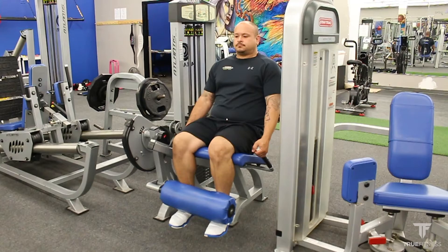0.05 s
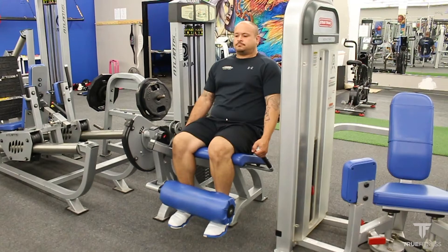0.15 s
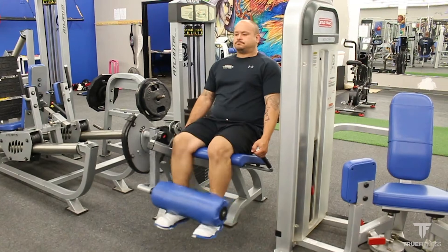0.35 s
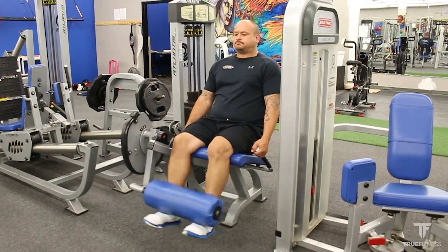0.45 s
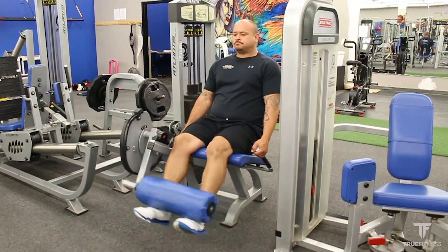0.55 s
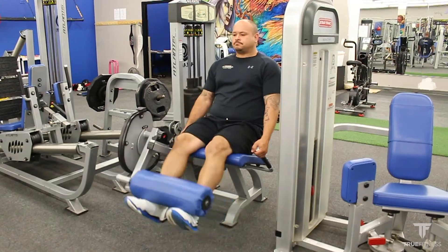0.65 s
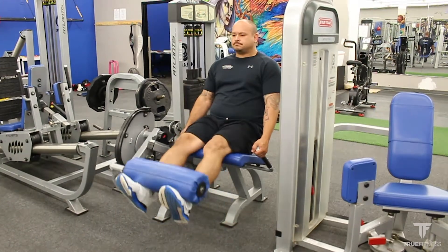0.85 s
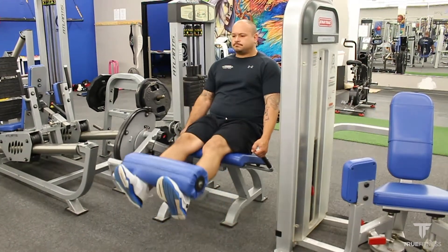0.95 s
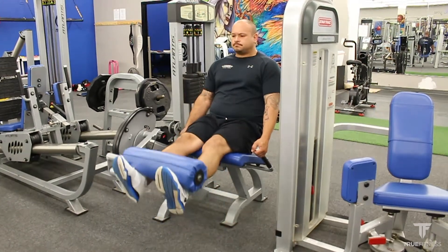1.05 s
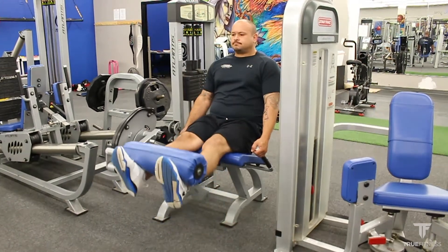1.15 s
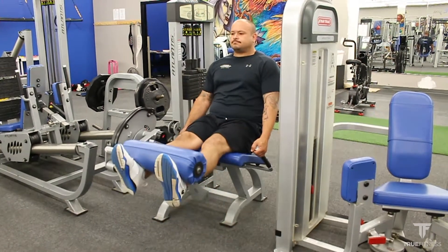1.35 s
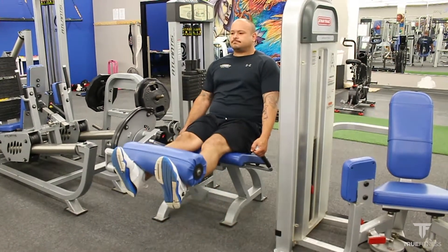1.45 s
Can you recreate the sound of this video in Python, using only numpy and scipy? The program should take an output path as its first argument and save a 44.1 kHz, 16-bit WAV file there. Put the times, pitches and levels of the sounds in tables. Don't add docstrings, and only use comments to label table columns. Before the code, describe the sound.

Steel plates clink lightly and the stack clanks hard, rattling briefly; a drier clack and creaking ticks follow, ending in small knocks. Close microphone, reverberant gym hall, faint hiss and low air rumble.

```python
import sys
import numpy as np
from scipy import signal
from scipy.fft import rfft, irfft
from scipy.io import wavfile
from scipy.ndimage import uniform_filter1d

SR = 44100
rng = np.random.default_rng(int(sys.argv[2]) if len(sys.argv) > 2 else 0)


def to_linear_factor(level_db):
    exponent = np.asarray(level_db, float) / 20
    return 10 ** exponent


def generate_wav(sig):
    pcm = np.round(np.clip(np.atleast_2d(sig).T, -1, 1) * 32767).astype(np.int16)
    wavfile.write(sys.argv[1], SR, pcm)


N = 66150
SPAN = 4096

# t/s, level/dB, rattle/s
CLINKS = [
    (.03, -37.5, 0.018),
    (.2375, -32, 0.0067),
    (.2435, -31.5, 0.0069),
    (.447, -30, 0.0085),
    (.459, -33.5, 0.0099),
    (.494, -39, 0.018),
]
# f/Hz, level/dB, t60/s
CLINK_MODES = [(895, 1, 0.015), (1598, 1, 0.091), (2750, 0, 0.14), (2920, 4.5, 0.062), (3310, 3.5, 0.12),
               (4180, -3.5, 0.084), (4645, -1, 0.11), (5200, -4.5, .05), (5760, -18, 0.054),
               (6500, -2, 0.042), (7080, 4, 0.021), (9150, -18, .04)]
# f/Hz, level/dB
CLINK_CRACK = [(180, -24.5), (300, 8), (565, -11), (1580, 2.5), (2100, -9), (2930, -5.5), (3830, -7),
               (9390, -20.5), (16000, -52)]
# t/s, level/dB, rattle/s
CLANKS = [
    (.2885, -10.5, 0.0045),
    (.2908, -9, 0.003),
    (.2927, -8, 0.0018),
    (.2965, -20, 0.014),
    (.3045, -24, .006),
    (.333, -30.5, 0.015),
]
# f/Hz, level/dB, t60/s
CLANK_MODES = [(361.3, 4.5, 0.29), (555, -7, 0.28), (596.6, -0.5, 0.3), (673, 10, 0.3), (760, 9, 0.32),
               (841, 3.5, 0.27), (1451, 9.5, 0.23), (1640, -20, 0.26), (2300, -15, 0.013),
               (3180, -9, 0.079), (3560, 3, 0.048), (4240, 1, 0.051), (5100, -18, 0.053), (6570, -13, .06)]
# f/Hz, level/dB
CLANK_CRACK = [(90, -54), (330, -16), (800, -1.5), (1150, -9.5), (1900, -7.5), (3100, -3.5), (6000, -18),
               (16000, -41)]
# t/s, level/dB, rattle/s
CLACKS = [
    (.6158, -25, 0.005),
    (.6208, -29, 0.012),
]
# f/Hz, level/dB, t60/s
CLACK_MODES = [(735, -11, 0.3), (1110, -39, 0.052), (1460, -3.5, 0.14), (2240, 6, 0.022), (2530, -16, 0.08),
               (2840, 4, 0.022), (2700, -3, 0.085), (3220, -6, 0.098), (3320, 3.5, 0.036),
               (4320, -28, 0.061), (5200, -19, 0.059)]
# f/Hz, level/dB
CLACK_CRACK = [(180, -4), (300, -1), (1840, -13), (2320, 2), (3400, 3), (6000, -17), (6850, -19),
               (7690, -26), (16000, -48)]
# t/s, level/dB, length/s
SNAPS = [
    (.2378, -32.5, 0.0062),
    (.2886, -28, 0.0032),
    (.333, -38.5, 0.0029),
    (.4472, -36, 0.0024),
    (.6152, -35.5, 0.002),
    (.7058, -36.5, 0.0018),
]
# f/Hz, level/dB
SNAP_EDGE = [(2000, -28), (6000, -3), (10000, -3.5), (16000, -18)]
# t/s, peak level/dB, f/Hz, t60/s
PINGS = [(.2378, -28, 1620, .07), (.2575, -38, 2800, .08), (.2905, -19, 812, .09), (.295, -21, 660, .08),
         (.297, -27, 370, .2), (.298, -27, 1450, .09), (.311, -27, 790, .07), (.329, -29, 600, .12),
         (.364, -32, 690, .12), (.2888, -22, 760, .04), (.4475, -34, 1640, .06), (.623, -30, 1110, .05),
         (.619, -29, 1510, .05), (1.2215, -30, 760, .04), (1.2492, -28, 830, .04), (.2379, -27, 3100, .035),
         (.2435, -27, 3150, .03), (.4473, -28, 2900, .04), (.4476, -31, 3450, .04),
         (.2886, -17, 13000, .003), (.2887, -21, 10500, .004), (.2888, -21, 8500, .005),
         (.2912, -26, 14500, .004), (.6106, -30, 3200, .01), (.6163, -14, 2450, .014),
         (.6168, -19, 2950, .012), (.6184, -17, 3350, .012), (.6211, -19, 3300, .014),
         (.6232, -23, 2600, .012), (.6262, -24, 2950, .018), (.631, -23, 3200, .02),
         (.6415, -23, 3100, .01), (.7056, -18, 1200, .005), (.7059, -27, 2050, .006),
         (.7071, -20, 1250, .006), (.712, -36, 700, .15), (.7092, -27, 800, .018), (.936, -34, 2500, .01),
         (1.1992, -22, 2900, .006), (1.2018, -29, 2900, .007), (1.2076, -26, 2870, .007),
         (1.2102, -27, 2900, .008), (1.2474, -21, 2700, .008), (1.2477, -28, 4600, .01),
         (1.25, -28, 2450, .012), (1.2522, -29, 2050, .012), (1.2548, -32, 3000, .008),
         (1.29, -33, 2000, .025)]
# t/s, level/dB, length/s
THUDS = [
    (.2975, -46, 0.015),
    (1.2225, -30, 0.0047),
    (1.2485, -36, 0.005),
]
# f/Hz, level/dB
THUD_BODY = [(50, -46), (130, -17), (290, 4), (460, -0.5), (900, -38), (2000, -61)]
# t/s, level/dB, brightness/(dB per octave), knock level/dB
TICKS = [(0.547, -49, -12, 0), (0.5612, -35, -7, -20), (0.576, -39, -2, -13), (0.588, -41.5, 2, 8.5),
         (0.598, -40, 3, 4), (0.611, -35, -6, 2), (.689, -33.5, -6, -29), (0.7015, -38, -1, -16),
         (0.7048, -33, -4, 6.5), (0.726, -38, -4, -24), (0.9358, -43.5, -16, 5.5), (0.987, -45.5, 4, -18),
         (0.999, -44, -1, -18), (1.061, -40.5, 2, -13), (1.071, -43, -5, 1), (1.132, -44.5, 7, 5),
         (1.141, -39, -3, -5), (1.182, -45, -1, -5), (1.1986, -41.5, 6, 2.5), (1.207, -34, 3, -3),
         (1.2204, -24.5, 5, -4.5), (1.2486, -32, -3, -1), (1.255, -44.5, -10, 12), (1.28, -40.5, 9, -23),
         (1.2927, -44.5, -2, 3), (1.341, -52, 15, -3), (1.36, -46, 4, 5)]
# f/Hz, level/dB, t60/s
TICK_MODES = [(2120, 5, 0.0036), (2850, -3, 0.005), (3340, 10.5, 0.0032), (4700, 2.5, 0.0013),
              (6260, -2, 0.0022), (8200, -5.5, 0.0032), (11200, -44, 0.0032)]
# f/Hz, level/dB
KNOCK_BODY = [(80, -30), (250, 3), (500, 1.5), (800, 1.5), (1250, 0.5), (2000, -7.5), (3000, -8),
              (6000, -31.5)]
# f/Hz, t60/s
HALL = [(200, 2.1), (700, 1.22), (1500, 0.74), (3000, 0.53), (6000, 0.57), (12000, 0.52)]
# f/Hz, level/dB
DULL = [(500, -3), (4000, 0.5), (7000, -1), (16000, -21)]
# f/Hz, level/dB
AIR = [(15, -65), (25, -7.5), (155, 1.5), (385, -10.5), (530, -6), (678, -10.5), (826, -11.5),
       (1060, -15.5), (9000, -49.5), (11700, -65), (19800, -120)]
# f/Hz, width/Hz, level/dB
DUCTS = [(61, 4.6, -58), (179.2, 72.6, -46), (362.4, 8.5, -52.5), (614, 11.4, -59.5), (2990, 1100, -58)]
# t/s, level/dB
SWELL = [(0.06, -43.5), (0.092, -41), (0.838, -44.5), (0.926, -38), (1.142, -42), (1.218, -37),
         (1.458, -54.5), (1.476, -33), (1.5, -64)]


def steel(events, modes, crack, ring_db, damp, rough_db):
    drive = blows(events, rough_db)
    t = np.arange(SR // 2) / SR
    ring = np.zeros(len(t))
    for hz, db, t60 in modes:
        partials = hz + rng.uniform(-1, 1, (5, 1)) * (0.02 * hz + 22)
        fade = to_linear_factor(db - 60 * t / min(t60 * damp, 0.26))
        ring += fade * np.sin(2 * np.pi * partials * t).sum(0)
    ringing = signal.oaconvolve(drive, ring / np.linalg.norm(ring))[:N]
    return colour(drive, crack) + to_linear_factor(ring_db) * ringing


def blows(events, rough_db):
    return sum(to_linear_factor(db) * burst(s, length, rough_db) for s, db, length in events)


def burst(s, length, rough_db, rise_s=0.000234):
    t = np.arange(SPAN) / SR
    shape = (1 - np.exp(-t / rise_s)) * np.exp(-t / max(length, 1e-4))
    wander = evened(uniform_filter1d(rng.standard_normal(SPAN), size=30))
    uneven = shape * to_linear_factor(rough_db * wander)
    grit = uneven * rng.standard_normal(SPAN)
    for _ in range(4):
        z = rfft(grit)
        flat = irfft(z / (abs(z) + 1e-12))
        local_power = abs(uniform_filter1d(flat ** 2, size=12))
        grit = uneven * flat / np.sqrt(local_power + 1e-12)
    out = np.zeros(N + SPAN)
    out[int(s * SR):][:SPAN] = grit * np.linalg.norm(shape) / np.linalg.norm(grit)
    return out[:N]


def pings():
    out, t = np.zeros(N + SPAN), np.arange(SPAN) / SR
    for s, db, hz, t60 in PINGS:
        swell = 1 - np.exp(-t * hz / 1.2)
        fade = to_linear_factor(db - 60 * t / t60)
        out[int(s * SR):][:SPAN] += swell * fade * np.sin(2 * np.pi * hz * t)
    return out[:N]


def pivot():
    tick_s, rebound_s, rebound_db, knock_s = 0.0012, 0.0027, -6, 0.0031
    out, t = np.zeros(N), np.arange(1500) / SR
    for s, db, bright_db, knock_db in TICKS:
        span = slice(int(s * SR), int(s * SR) + 3000)
        slip = burst(s, tick_s, 2.4, 0.00028)
        slip += to_linear_factor(rebound_db) * burst(s + rebound_s, tick_s, 2.7, 0.00018)
        slip = slip[span]
        pin = np.zeros(len(t))
        for hz, level, t60 in TICK_MODES:
            tilt_db = bright_db * np.log2(hz / 3000)
            pin += to_linear_factor(level + tilt_db - 60 * t / t60) * np.sin(2 * np.pi * hz * t)
        tick = signal.oaconvolve(slip, pin)[:len(slip)]
        knock = colour(burst(s, knock_s, 2.85)[span], KNOCK_BODY)
        out[span] += to_linear_factor(db - 17.5) * (evened(tick) + to_linear_factor(knock_db) * evened(knock))
    return out


def hall(x, t60_scale, delay_s=0.0068):
    hz, t, z = signal.stft(rng.standard_normal((3, SR)), SR, nperseg=256)
    fade = to_linear_factor(-60 * t / (t60_scale * read(HALL, hz)[:, None]))
    tails = signal.istft(z * fade, SR, nperseg=256)[1]
    tails = tails * np.clip(np.arange(tails.shape[1]) / SR / delay_s, 0, 1) ** 2
    tails = tails / np.linalg.norm(tails[0])
    stir_hz = 7
    phase = stir_hz * np.arange(N) / SR + np.arange(3)[:, None] / 3
    turns = np.cos(2 * np.pi * phase) * np.sqrt(2 / 3)
    echoes = signal.fftconvolve(x[None], tails, axes=1)[:, :N]
    return (turns * echoes).sum(0)


def air():
    out = to_linear_factor(-37 - 3.5) * evened(colour(rng.standard_normal(N), AIR))
    s, db = np.transpose(SWELL)
    swell = to_linear_factor(np.interp(np.arange(N) / SR, s, db - db.mean()))
    for k, (hz, width, level_db) in enumerate(DUCTS):
        narrow = resonate(rng.standard_normal(N), hz, width)
        tone = evened(resonate(narrow, hz, 2 * width))
        out += to_linear_factor(level_db) * tone * (swell if k == 1 else 1)
    return out


def unmasked(side, mid):
    side_bins, mid_bins = (signal.stft(v, nperseg=2048)[2] for v in (side, mid))
    side_power, mid_power = (uniform_filter1d(abs(z) ** 2, size=24, axis=0)
                             for z in (side_bins, mid_bins))
    heard = mid_power < to_linear_factor(2 * 16) * side_power
    return signal.istft(side_bins * heard, nperseg=2048)[1][:N]


def read(points, hz):
    f, value = np.transpose(points)
    return np.interp(np.log(hz + 1), np.log(f + 1), value)


def evened(x):
    return x / np.sqrt(np.mean(x ** 2) + 1e-20)


def colour(x, points):
    size = 4096
    log_gain = np.log(to_linear_factor(read(points, abs(np.fft.fftfreq(size, 1 / SR)))))
    response = np.exp(np.conj(signal.hilbert(log_gain)))
    taps = np.fft.ifft(response).real[:size // 2]
    return signal.oaconvolve(x, taps / np.linalg.norm(taps))[:len(x)]


def resonate(x, hz, width):
    r = np.exp(-np.pi * width / SR)
    turn = np.exp(2j * np.pi * hz * np.arange(len(x)) / SR)
    return 2 * (turn * signal.lfilter([1 - r], [1, -r], x / turn)).real


def scene():
    clink = steel(CLINKS, CLINK_MODES, CLINK_CRACK, ring_db=0.5, damp=0.4, rough_db=1.5)
    clank = steel(CLANKS, CLANK_MODES, CLANK_CRACK, ring_db=-6, damp=1.0, rough_db=0.33)
    clack = steel(CLACKS, CLACK_MODES, CLACK_CRACK, ring_db=-3, damp=0.5, rough_db=1.5)
    snaps = colour(blows(SNAPS, 0.75), SNAP_EDGE)
    notes = pings()
    thuds = colour(blows(THUDS, 6.5), THUD_BODY)
    ticks = pivot()
    wet = to_linear_factor(-6.5) * hall(clink, 1.0)
    wet += to_linear_factor(-13.5) * hall(clank + thuds, 1.0)
    wet += to_linear_factor(-9.5) * hall(clack, 1.0)
    wet += to_linear_factor(-12.5) * hall(colour(ticks, DULL), 0.41)
    wet += to_linear_factor(-12) * hall(notes, 0.43)
    mono = clink + clank + clack + ticks + thuds + snaps + notes + wet + air()
    return np.array([mono, mono])


def roll_off(x):
    return signal.sosfilt(signal.butter(12, 16530, fs=SR, output="sos"), x)


def record(dry):
    limit, hiss_db, open_s, edge_hz = 1.6, -57.5, 0.056, 15600
    centre, side = to_linear_factor(hiss_db) * rng.standard_normal((2, N))
    side = unmasked(side, dry.mean(0) + centre)
    mix = limit * np.tanh(dry / limit) + centre + np.array([side, -side])
    mix = mix * (np.arange(N) / SR > open_s)
    mix = signal.oaconvolve(mix, signal.firwin(255, edge_hz, fs=SR)[None], "same")
    return roll_off(mix)


dry = scene()
out = record(dry)
generate_wav(out)
```